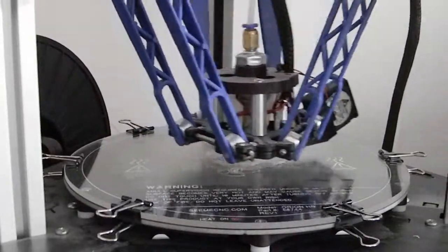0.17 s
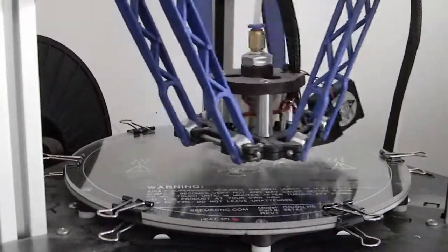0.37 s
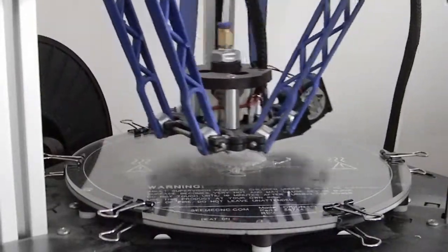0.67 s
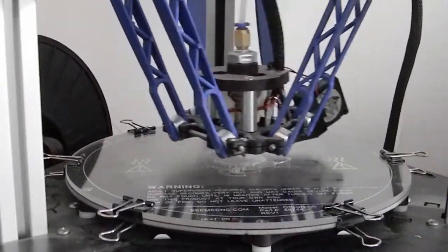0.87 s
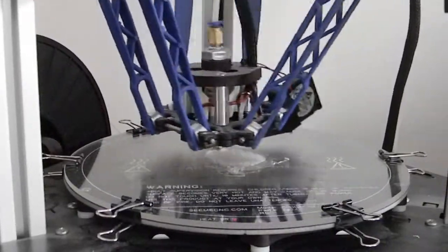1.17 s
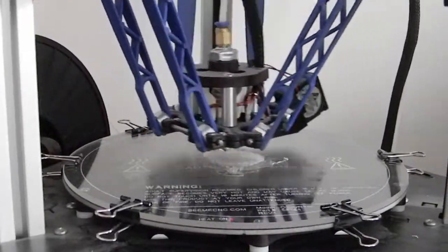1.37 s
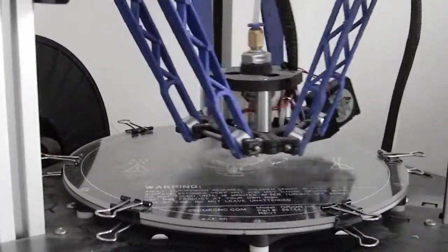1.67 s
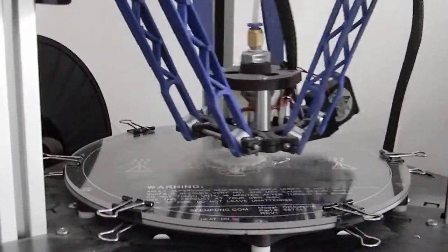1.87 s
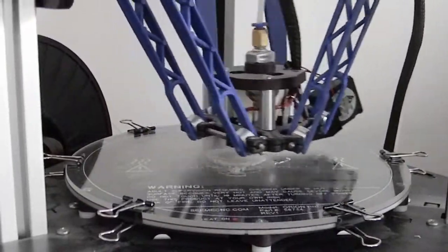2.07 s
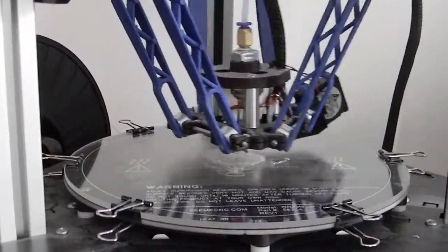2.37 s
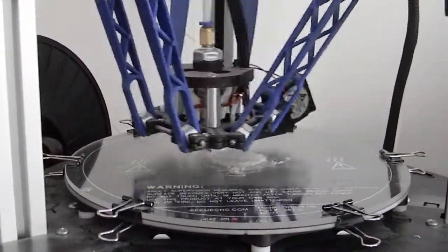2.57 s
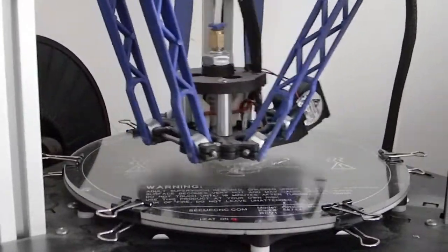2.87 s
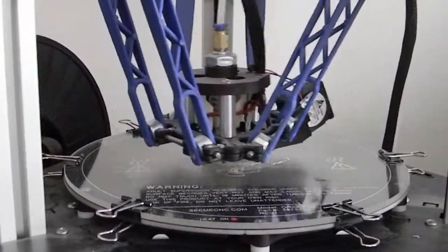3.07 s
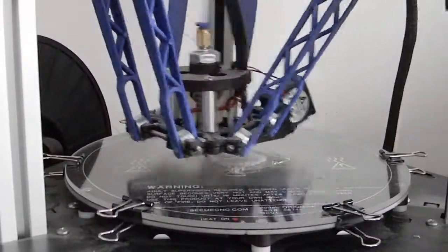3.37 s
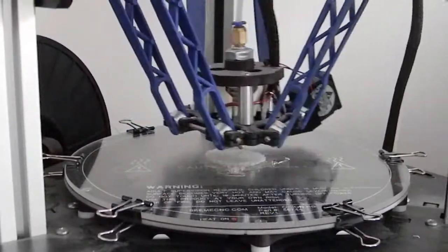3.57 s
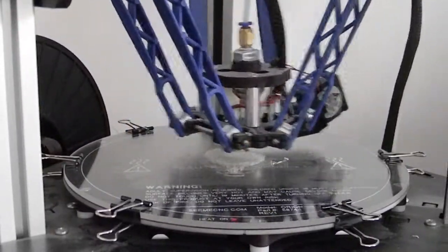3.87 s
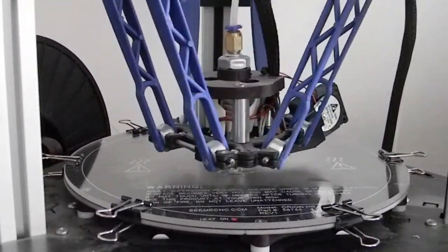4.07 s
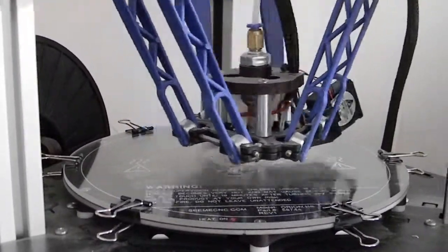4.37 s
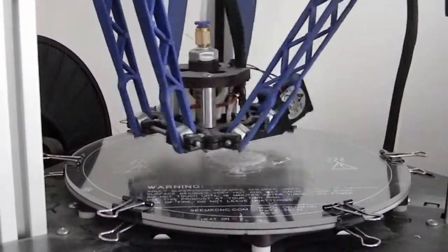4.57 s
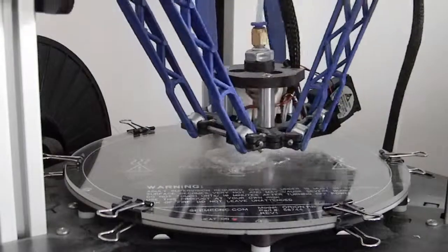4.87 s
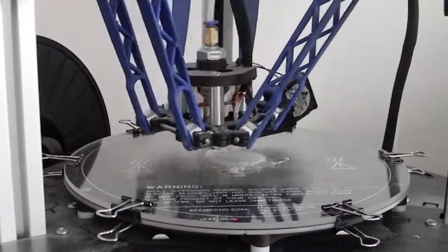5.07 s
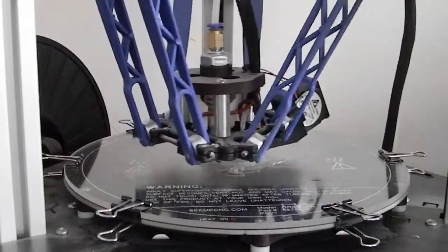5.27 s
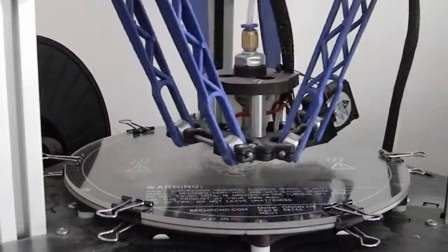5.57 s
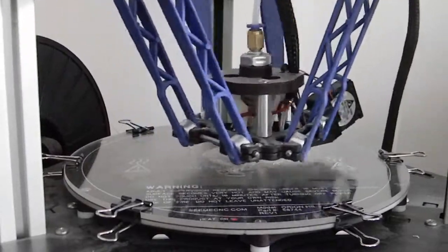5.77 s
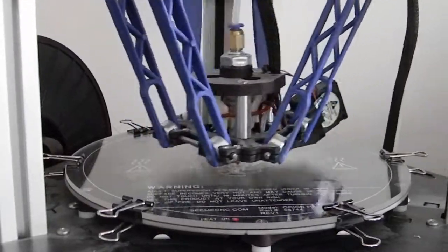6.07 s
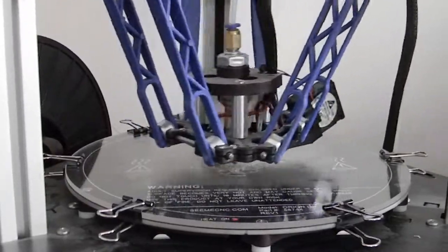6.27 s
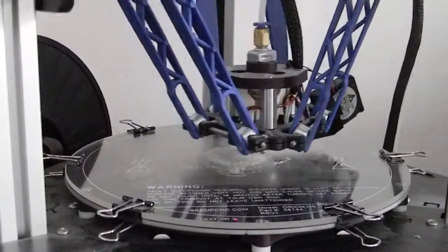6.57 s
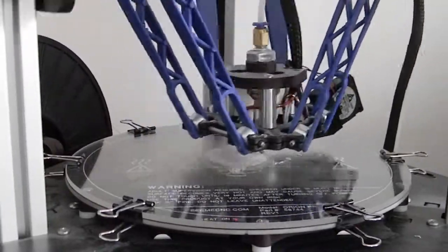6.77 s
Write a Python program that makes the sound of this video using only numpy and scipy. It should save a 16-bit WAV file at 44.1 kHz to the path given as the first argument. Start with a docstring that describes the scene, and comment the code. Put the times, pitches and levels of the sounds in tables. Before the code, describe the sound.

Close stereo sound of a 3D printer sped up. Stepper motors glide up and down in quick zigzag strokes, about ten per second, with a high buzzing extruder whine and a knock or shudder at each turn. Midway the strokes break into tiny jittery moves and chirps with dry hiss, then the regular zigzag returns. Fans hiss throughout in a small, fairly dry space.

```python
"""Beside a delta 3D printer laying infill, heard sped up several times by a close stereo pair.
On each stroke the tower steppers glide against each other while the extruder ticks at a steady high rate:
partials follow pitch curves. Turns and short moves shake the frame, made of motor tones and knocks
through resonances. Belts and joints sizzle as filtered noise; two fans hiss and whine throughout."""
import sys
import numpy as np
from scipy import signal
from scipy.fft import rfft, irfft, next_fast_len
from scipy.io import wavfile
from scipy.ndimage import uniform_filter1d

SR = 44100
rng = np.random.default_rng(int(sys.argv[2]) if len(sys.argv) > 2 else 0)


def to_wav(sig):
    """Store sig (one row per channel, or 1-D mono) as 16-bit WAV at the path in sys.argv[1].

    Samples outside -1..1 are clipped; the rate is SR.
    """
    pcm = np.clip(np.atleast_2d(sig), -1, 1) * 32767
    pcm = np.round(pcm).astype(np.int16)
    wavfile.write(sys.argv[1], SR, pcm.T)  # frames by channels


N = 304731
SIZE = next_fast_len(N, True)
TIME, FREQ = np.arange(N) / SR, np.fft.rfftfreq(SIZE, 1 / SR)

# partials of the steppers on short moves and hops: multiple, relative_db
MOTOR_PARTIALS = [(1, 3), (2, -1), (3, -8)]


def amp(db):
    """Decibels to gain."""
    return 10 ** (np.asarray(db) / 20)


def unit(x):
    """Scales to rms 1."""
    return x / np.sqrt(np.mean(x ** 2) + 1e-20)


def curve(rows, axis=1):
    """One column of a time table at every sample."""
    columns = np.transpose(rows)
    return np.interp(TIME, columns[0], columns[axis])


def spectrum(points):
    """Gain at every frequency from (Hz, dB) points."""
    hz, db = np.transpose(points)
    return amp(np.interp(np.log(FREQ + 1), np.log(hz), db))


def resonances(modes):
    """Gain of steep-sided resonances, each alone 12 dB down at its width from the peak."""
    power = sum(amp(db) ** 2 / (1 + ((FREQ - hz) / width) ** 2) ** 4 for hz, width, db in modes)
    return np.sqrt(power)


def colour(x, gain):
    """Filters by a gain at every frequency."""
    return irfft(rfft(x, SIZE) * gain, SIZE)[..., :N]


def drift(rate, order=N):
    """Slow chance of rms 1, changing about rate times a second, order samples long."""
    values = rng.standard_normal(order // 8)
    return unit(np.interp(2 * rate * TIME[:order], np.arange(len(values)), values))


def wide_noise(gain, side):
    """Coloured noise in two channels with an unrelated side part."""
    mid, other = unit(colour(rng.standard_normal((2, N)), gain))
    other = colour(other, side)
    return np.array([mid + other, mid - other])


def tone(hz, partials):
    """Sine partials at whole multiples of a pitch curve, each from a random phase."""
    turns = np.cumsum(hz) / SR
    waves = (amp(db) * np.sin(2 * np.pi * (round(k) * turns + rng.random())) for k, db in partials)
    return np.sqrt(2) * sum(waves)


def room(x, t60, wet_db):
    """Direct sound plus a short scatter of nearby reflections, different at each ear."""
    t = np.arange(SR // 8) / SR
    taps = rng.standard_normal((2, len(t))) * amp(-60 * t / t60)
    taps /= np.linalg.norm(taps, axis=1, keepdims=True)
    return x + amp(wet_db) * signal.fftconvolve(x[None], taps, axes=1)[:, :N]


def window(start, end, fade):
    """Sample numbers of a move and its soft-edged gate."""
    at = np.flatnonzero((TIME > start - fade) & (TIME < end + fade))
    edge = np.minimum(TIME[at] - start, end - TIME[at])
    return at, np.clip(.5 + .5 * edge / fade, 0, 1)


def bump(s, length):
    """A bell in time, half as high at half its length from the middle."""
    return 2 ** -np.minimum((2 * (TIME - s) / length) ** 2, 60)


def stepper(hz, partials, wobble=.004):
    """A motor's tone, with the grain of its own belt teeth; a large wobble of pitch makes it a buzz."""
    rough_db, rough_per_s = 1.6, 75
    grain = unit(amp(rough_db * drift(rough_per_s, order=len(hz))))
    return grain * tone(hz * (1 + wobble * drift(120, order=len(hz))), partials)


def extruder_dashes(count):
    """Gains that let each extruder partial come in quick dashes, all on one uneven beat."""
    dash_per_s, dash_db = 20, 5.5
    beats = np.cumsum(dash_per_s * (1 + .2 * drift(10))) / SR
    dashes = []
    for _ in range(count):
        swing = np.tanh(2 * np.sin(2 * np.pi * beats + drift(5)) + .5)
        dashes.append(unit(amp(dash_db * swing + 2 * np.tanh(drift(12)))))
    return dashes


def long_strokes(sum_hz, slope):
    """The lead motor glides, a second the other way, a third buzzes nearly level; the extruder steps."""
    # zigzag infill: start_s, end_s, lead_from_hz, lead_to_hz, extruder_step_hz,
    # whine_db (before the frame), whistle_hz, whistle_db
    strokes = [(0.0, 0.1, 550, 1160, 1234.0, -34.4, 4705, -50),
               (0.114, 0.215, 1160, 545, 1234.5, -36.6, 4700, -52),
               (0.233, 0.325, 505, 1160, 1254.0, -35.7, 4775, -55),
               (0.335, 0.432, 1135, 595, 1216.5, -36.1, 4620, -56),
               (0.447, 0.549, 535, 1185, 1206.5, -35.5, 4830, -58),
               (0.559, 0.654, 1150, 545, 1240.0, -35.6, 4725, -55),
               (0.67, 0.761, 480, 1150, 1229.0, -34.5, 4680, -55),
               (0.775, 0.87, 1135, 605, 1228.0, -38.8, 4680, -54),
               (0.9, 0.994, 480, 1150, 1238.0, -35.6, 4715, -53),
               (1.014, 1.121, 1160, 590, 1248.5, -37.5, 4755, -54),
               (1.131, 1.223, 520, 1150, 1200.5, -34.3, 4805, -55),
               (1.243, 1.343, 1160, 625, 1221.5, -38.3, 4630, -50),
               (1.365, 1.451, 620, 1125, 1250.5, -38.0, 4735, -52),
               (1.461, 1.546, 1090, 610, 1244.0, -38.1, 4715, -53),
               (1.56, 1.646, 490, 1100, 1246.0, -36.0, 4720, -52),
               (1.665, 1.751, 1090, 605, 1200.5, -37.3, 4800, -56),
               (1.771, 1.859, 540, 1100, 1256.0, -36.3, 4790, -53),
               (1.871, 1.955, 1090, 620, 1233.0, -38.3, 4700, -53),
               (1.974, 2.051, 585, 1110, 1209.5, -35.1, 4595, -54),
               (2.081, 2.147, 1040, 590, 1237.5, -37.7, 4720, -52),
               (2.175, 2.235, 695, 1015, 1218.0, -36.7, 4600, -53),
               (2.25, 2.308, 1030, 675, 1240.0, -39.9, 4715, -50),
               (2.322, 2.394, 650, 1050, 1254.5, -37.7, 4750, -54),
               (2.406, 2.483, 1015, 720, 1252.0, -41.5, 4765, -54),
               (2.525, 2.61, 595, 1110, 1227.0, -36.5, 4660, -52),
               (2.668, 2.737, 1090, 665, 1227.5, -39.3, 4665, -53),
               (2.769, 2.856, 570, 1125, 1211.0, -35.6, 4850, -52),
               (2.9, 2.966, 1015, 745, 1203.0, -36.0, 4805, -52),
               (2.982, 3.035, 715, 1065, 1213.0, -39.0, 4850, -54),
               (3.05, 3.1, 1050, 685, 1249.0, -39.4, 4570, -60),
               (3.21, 3.26, 750, 980, 1233.5, -38.9, 4675, -50),
               (3.274, 3.33, 1050, 750, 1212.0, -39.7, 4840, -54),
               (3.365, 3.435, 600, 1110, 1201.0, -33.9, 4800, -51),
               (3.565, 3.62, 680, 1030, 1223.0, -36.5, 4600, -55),
               (3.63, 3.68, 990, 810, 1200.0, -42.3, 4820, -57),
               (5.5, 5.56, 790, 1065, 1257.5, -36.2, 4670, -57),
               (5.592, 5.635, 1015, 775, 1243.5, -33.0, 4690, -52),
               (5.657, 5.72, 695, 1065, 1200.0, -32.1, 4800, -55),
               (5.746, 5.8, 1050, 710, 1259.0, -32.9, 4770, -50),
               (5.824, 5.86, 775, 1040, 1233.5, -33.1, 4810, -58),
               (5.875, 5.944, 1075, 705, 1236.0, -33.2, 4705, -50),
               (5.976, 6.04, 690, 1065, 1237.0, -32.8, 4675, -48),
               (6.062, 6.13, 1090, 655, 1256.5, -34.0, 4760, -51),
               (6.147, 6.215, 685, 1065, 1241.5, -32.8, 4705, -48),
               (6.229, 6.298, 1075, 605, 1199.0, -33.4, 4795, -51),
               (6.345, 6.42, 630, 1090, 1210.5, -32.3, 4840, -54),
               (6.442, 6.516, 1090, 655, 1214.0, -33.0, 4625, -54),
               (6.552, 6.634, 620, 1100, 1197.5, -32.8, 4785, -51),
               (6.65, 6.731, 1100, 625, 1232.5, -33.5, 4670, -52),
               (6.749, 6.84, 590, 1125, 1206.0, -32.6, 4825, -53),
               (6.856, 6.908, 1090, 785, 1245.0, -33.2, 4730, -54)]
    # lead motor: multiple, relative_db
    lead_partials = [(1, 0), (2, -6.5), (3, -14)]
    # second tower's motor: multiple, relative_db
    second_partials = [(1, 0), (2, -6)]
    # hum one octave below the lead motor: time_s, level_db (before the frame)
    undertone = [(0, -45), (2.8, -45), (3.7, -46), (5.5, -54), (6.91, -54)]
    # extruder steps: multiple, level_db (at the lead's usual pitch), gain_db_per_khz (of lead pitch)
    extruder_partials = [(2, -52.5, 0), (3, -57.5, 0), (4, -62, 0), (5, -53.5, 22), (6, -45, 0),
                         (7, -60, 0), (8, -49.5, -15), (9, -53, -5), (10, -49.5, 0), (11, -50.5, 0),
                         (12, -50.5, -10), (13, -55, 0)]
    mid_hz, arch_hz = 864, 34.1  # lead's usual mid-stroke pitch; bow from the arm geometry
    second_db, second_top_hz = -45, 830  # level at 600 Hz; highest pitch
    third_hz, third_scatter, third_db = 857, 0.0358, -42  # scatter is a share of pitch
    whistle_waver = .0015  # share of pitch
    follow_s = 0.057  # the frame follows the head's speed over this time

    whine, steps, moving, cruising, pace = np.zeros((5, N))
    dashes = extruder_dashes(len(extruder_partials))
    chances = rng.standard_normal((len(strokes), 2))
    for stroke, chance in zip(strokes, chances):
        start, end, from_hz, to_hz, step_hz, db, whistle_hz, whistle_db = stroke
        at, gate = window(start, end, fade=.006)
        part = np.clip((TIME[at] - start) / (end - start), 0, 1)
        middle = 4 * part * (1 - part)  # 1 in mid-stroke, 0 at the turns

        lead_hz = from_hz + (to_hz - from_hz) * part + arch_hz * middle
        second_hz = np.minimum(sum_hz - slope * lead_hz, second_top_hz)
        bend = chance[0] * part + chance[1] * (1 - part)
        buzz_hz = third_hz * (1 + third_scatter * bend)
        faster_khz = np.clip(lead_hz - mid_hz, -180, 170) / 1000

        sings = np.minimum(lead_hz / 760, 1) ** 5  # the lead motor fades when slow
        under_db = np.interp(start, *np.transpose(undertone))
        whine[at] += gate * sings * amp(db) * stepper(lead_hz, lead_partials)
        whine[at] += gate * sings * amp(under_db) * stepper(lead_hz / 2, [(1, 0)])
        second_level = amp(second_db) * (second_hz / 600) ** 2
        whine[at] += gate * second_level * stepper(second_hz, second_partials)
        buzz = stepper(buzz_hz, [(1, -6), (2, -2.5), (3, -9)], wobble=.016)
        whine[at] += gate * amp(third_db) * buzz

        flow = gate * middle ** .3  # the extruder runs hardest in mid-stroke
        for (k, level_db, db_per_khz), dash in zip(extruder_partials, dashes):
            level = flow * dash[at] * amp(db_per_khz * faster_khz)
            steps[at] += level * tone(np.full(len(at), step_hz), [(k, level_db)])
        waver = 1 + whistle_waver * drift(40, order=len(at))
        steps[at] += gate * tone(whistle_hz * waver, [(1, whistle_db)])

        moving[at] += gate
        cruising[at] += gate * middle
        pace[at] += gate * faster_khz
    return whine, steps, np.minimum(moving, 1), cruising, uniform_filter1d(pace, round(follow_s * SR))


def hops():
    """Each quick hop of the head, without extrusion, is one short chirp of a motor."""
    # start_s, end_s, from_hz, to_hz, whine_db (before the frame)
    hop_rows = [(2.96, 2.987, 755, 1030, -56), (3.135, 3.165, 720, 1000, -54),
                (3.17, 3.223, 1075, 767, -42), (3.328, 3.35, 747, 1110, -39), (3.445, 3.5, 1027, 664, -40),
                (3.5, 3.535, 1090, 910, -43), (3.548, 3.563, 700, 950, -30), (3.683, 3.699, 1052, 696, -32),
                (3.74, 3.77, 1030, 754, -49), (3.78, 3.794, 798, 1050, -32),
                (3.925, 3.959, 804, 1050, -35.5), (3.98, 4.01, 740, 932, -32.5),
                (4.06, 4.089, 1010, 750, -39.5), (4.34, 4.374, 1020, 760, -35),
                (4.415, 4.448, 770, 934, -39.5), (4.45, 4.473, 744, 1014, -37),
                (4.56, 4.588, 1006, 770, -42), (4.58, 4.613, 792, 1037, -39), (4.61, 4.666, 830, 770, -38),
                (4.745, 4.787, 735, 896, -42), (6.295, 6.336, 790, 1090, -37)]
    whine = np.zeros(N)
    for start, end, from_hz, to_hz, db in hop_rows:
        at, gate = window(start, end, fade=0.00507)
        glide_hz = np.interp(TIME[at], [start, end], [from_hz, to_hz])
        whine[at] += gate * amp(db) * stepper(glide_hz, MOTOR_PARTIALS)
    return whine


def short_moves(move_s, low_hz, high_hz, count=2):
    """Over many tiny segments the motors start together, glide each its own way, and fade at the corner."""
    edges = np.cumsum(move_s * (.4 + 1.2 * rng.random(2000))) - 2 * move_s
    move, part = np.divmod(np.interp(TIME, edges, np.arange(len(edges))), 1)
    out = np.zeros(N)
    for _ in range(count):
        first, last = rng.uniform(low_hz, high_hz, (len(edges), 2))[move.astype(int)].T
        out += tone(first + (last - first) * part, MOTOR_PARTIALS)
    return unit(out * np.sin(np.pi * part) ** .6)


def knocks(per_s):
    """Slack in the joints: small random knocks."""
    return unit(rng.standard_normal(N) * (rng.random(N) < per_s / SR))


def turn_levels(sizzle_db):
    """Strength of the frame shake and of the sizzle that the head's sharp turns cause."""
    # middle_s, length_s (before spreading), jolt_db (relative)
    turns = [(0.105, 0.024, -40), (0.226, 0.015, -37), (.329, 0.011, -44), (0.446, 0.026, -34.5),
             (0.554, 0.012, -34.5), (0.653, 0.018, -34.5), (0.777, 0.016, -49), (0.886, 0.041, -34.5),
             (1.009, 0.016, -32), (1.125, 0.017, -34), (1.237, 0.024, -34), (1.357, 0.029, -37),
             (1.444, 0.0088, -37), (1.553, 0.026, -32.5), (1.65, 0.025, -38), (1.761, 0.033, -32.5),
             (1.869, .012, -34.5), (1.958, 0.013, -33), (2.074, 0.039, -36.5), (2.164, 0.037, -34.5),
             (2.246, 0.021, -35), (2.319, 0.017, -34), (2.4, 0.019, -34.5), (2.504, 0.051, -31.5),
             (2.647, 0.065, -34.5), (2.763, 0.052, -32.5), (2.883, 0.054, -31), (2.977, 0.016, -33.5),
             (3.049, 0.026, -32.5), (3.096, 0.021, -34), (3.19, 0.045, -36), (3.268, 0.024, -39.5),
             (3.35, 0.037, -34.5), (3.5, 0.041, -35), (3.557, 0.028, -35), (3.633, 0.031, -35.5),
             (3.726, 0.022, -29.5), (3.802, 0.032, -34.5), (3.919, 0.013, -31), (3.995, 0.011, -32.5),
             (4.073, 0.018, -35), (4.14, 0.031, -42), (4.35, 0.018, -34), (4.398, 0.01, -34),
             (4.427, 0.0094, -35), (4.535, 0.0091, -37), (4.577, 0.02, -34.5), (4.756, 0.016, -34),
             (5.198, .012, -39), (5.5, 0.013, -33), (5.55, 0.072, -33), (5.647, 0.035, -35.5),
             (5.732, 0.028, -33.5), (5.822, 0.046, -33), (5.85, 0.036, -35), (5.963, 0.039, -33),
             (6.05, .025, -31.5), (6.127, 0.021, -36), (6.224, 0.014, -34.5), (6.317, 0.038, -31),
             (6.434, 0.023, -31), (6.535, 0.037, -31.5), (6.648, 0.015, -39), (6.742, 0.019, -31),
             (6.848, 0.015, -52)]
    ring_s, sizzle_spread_s = 0.012, 0.0061  # added to each turn's length
    shake, sizzle = np.zeros((2, N))
    for s, length, db in turns:
        shake += amp(db) ** 2 * bump(s, length + ring_s) ** 2
        sizzle += amp(db + sizzle_db) ** 2 * bump(s, length + sizzle_spread_s)
    return np.sqrt(shake), np.sqrt(sizzle)


def frame(whine, moving, pace, turn_shake):
    """Motor whine, darting moves and knocks all ring through the frame and thud into the stand."""
    # shaking by small moves: time_s, lower_modes_db, upper_modes_db (both relative)
    shake = [(0, -28, -36), (2.4, -34.5, -37.5), (3.5, -36.5, -36.5), (4.0, -37.5, -38), (4.06, -34, -38),
             (4.4, -33.5, -37), (4.77, -33, -39.5), (4.79, -38.5, -39), (5.45, -37.5, -38),
             (5.48, -30.5, -37.5), (6.91, -31.5, -36.5)]
    # drive of the deep modes and stand by the head's position: time_s, drive_db (relative)
    deep_curve = [(0, 6.5), (1, 3.5), (1.8, 7), (2.8, 5), (3.7, 7), (4.4, -2.5), (5.1, 1.5), (5.6, -3.5),
                  (6.3, 1), (6.91, -2)]
    # frame resonances, deep, low and high, then the stand's heavy parts: centre_hz, width_hz, relative_db
    deep_modes = [(502.5, 41, -5.5), (573, 58, -6)]
    low_modes = [(668, 86, -8), (751.4, 34, -0.6), (821, 69, -3), (934, 110, -2), (1050, 114, -2.5),
                 (1140, 65, -3.5)]
    high_modes = [(1347, 99, -7), (1427, 43, -7), (1530, 53, -2), (1709, 150, 0), (1839, 59, -0.5),
                  (1920, 114, -6), (2045, 110, -9.5), (2250, 71, -6.5), (2530, 64, -13), (2476, 160, -4.5),
                  (2740, 130, -5), (3180, 120, -14.5)]
    stand_modes = [(89.5, 64, 0.5), (256, 98, 3), (361, 68, 5)]
    # how strongly the frame sings with a motor at each pitch: pitch_hz, gain_db
    whine_response = [(440, -30), (500, -6), (545, -.5), (600, -5), (680, -13), (760, -5.5), (845, -10),
                      (900, -5), (950, -2), (1040, -.5), (1150, -5), (1240, -20), (1540, -4), (1930, -1),
                      (2050, -16), (3400, -16)]
    calm_db, upper_calm_db = -11.5, -5  # a long stroke calms the frame
    shake_db_per_khz, deep_db_per_khz = 6, 26  # more shaking while the lead motor is fast

    deep, low, high = resonances(deep_modes), resonances(low_modes), resonances(high_modes)
    deep_drive = amp(curve(deep_curve))
    darting = short_moves(move_s=.016, low_hz=560, high_hz=1180, count=3)
    rattle = knocks(per_s=3500)
    push = darting + amp(7) * rattle
    jolt = short_moves(move_s=.006, low_hz=480, high_hz=1180, count=3) + amp(12) * rattle

    deep_share = deep_drive * amp(deep_db_per_khz * pace - 5.0)
    lower = unit(colour(push, low) + amp(8.5) * deep_share * colour(push, deep))
    jolted = unit(colour(jolt, low) + deep_share * colour(jolt, deep))
    upper = unit(unit(colour(darting, high)) + amp(-0.5) * unit(colour(rattle, high)))

    calm = amp(calm_db * moving + shake_db_per_khz * pace)
    shake_level, jolt_level = amp(curve(shake) - 3.0) * calm, amp(-2.0) * turn_shake
    upper_steady = amp(curve(shake, axis=2) + 0.13) * amp(upper_calm_db * moving)
    upper_level = np.hypot(upper_steady, amp(-8.0) * turn_shake)
    sung = colour(whine, spectrum(whine_response))
    ringing = lower * shake_level + jolted * jolt_level + upper * upper_level + sung
    radiated = spectrum([(300, -31), (455, -20), (505, -0.5)])  # light struts give off little bass
    body = room(colour(ringing, radiated), t60=0.036, wet_db=-30)

    thud_level = unit((np.hypot(shake_level, jolt_level) * deep_drive) ** 0.54)
    thud = wide_noise(resonances(stand_modes), side=amp(-7.5)) * thud_level * amp(-67.0)
    # the frame's ringing reaches the left side one sample first
    return np.array([body[0], np.roll(body[1], 1)]) + thud


def belts(cruising, pace, turn_sizzle):
    """Belts rasp and joints sizzle, each with its own grit, with a thin creeping hiss and a top hiss."""
    # belts and joints: time_s, level_db (relative)
    sizzle_curve = [(0, -38), (2.4, -39.5), (3.7, -38), (4.15, -39), (4.75, -39.5), (4.79, -43),
                    (5.45, -41.5), (5.48, -38), (6.91, -39.5)]
    # thin hiss of the belts during slow moves: time_s, level_db (before flutter)
    creep_curve = [(0, -93.5), (3.8, -62), (4.3, -46.5), (4.74, -47), (4.85, -40), (4.95, -40.5),
                   (5.1, -46), (5.19, -40), (5.3, -42.5), (5.44, -45), (5.52, -85), (6.91, -79)]
    # fine hiss at the very top: time_s, level_db (before the band limit)
    top_curve = [(0, -47), (2, -45), (3.7, -45), (4.6, -40), (4.85, -48), (5.4, -46), (5.55, -38),
                 (6.2, -43), (6.91, -35.5)]
    # resonances of belts, joints and creeping belts: centre_hz, width_hz, relative_db
    belt_modes = [(2570, 1570, 2), (3630, 210, -2.5), (4570, 350, -3.5), (5180, 290, 2.5), (5620, 110, 4),
                  (6055, 195, 4), (6820, 350, 1), (7550, 370, 0)]
    joint_modes = [(8300, 1500, -1.2), (9740, 1080, 1), (11030, 1300, 1.5), (12240, 610, 0.5),
                   (13200, 1800, 0.5), (14400, 850, 0.5), (14840, 640, 4.5)]
    creep_modes = [(5240, 150, 7), (5730, 280, -14), (5930, 400, 7.5), (6600, 250, 2), (7360, 1000, 2),
                   (13900, 750, 0)]
    smooth_db, sizzle_db_per_khz = -3.5, -11  # joints run smoothest in mid-stroke; fast ones sizzle less
    flutter_db, flutter_per_s = 2, 30

    steady, smooth = amp(curve(sizzle_curve) - 2.0), amp(smooth_db * cruising)
    level = np.hypot(steady * smooth, amp(-3) * turn_sizzle) * amp(sizzle_db_per_khz * pace)
    rasp_shape = np.hypot(steady * np.sqrt(smooth), amp(-3.5) * turn_sizzle) ** 2.15
    rasp_level = amp(-42.0) * unit(rasp_shape)
    rasp_grit = unit(amp(4.1 * np.tanh(drift(229))))
    rasp = wide_noise(resonances(belt_modes), side=amp(-25)) * rasp_level * rasp_grit

    sizzle = np.zeros((2, N))
    for hz, width, db in joint_modes:
        grit = unit(amp(2.84 * drift(40)))
        noise = wide_noise(resonances([(hz, width, 0)]), side=amp(-7.0))
        sizzle += amp(db) * np.sqrt(width) * grit * noise
    sizzle = unit(sizzle) * level * amp(2.5) * unit(amp(1.05 * drift(450)))

    creep_level = amp(curve(creep_curve) + flutter_db * drift(flutter_per_s))
    creep = wide_noise(resonances(creep_modes), side=amp(-13)) * creep_level
    top = wide_noise(resonances([(15860, 380, 0)]), side=amp(-3)) * amp(curve(top_curve))
    return rasp + sizzle + creep + top


def fans():
    """Rushing air and the slightly wavering blade tones of two fans."""
    # air through the fans: frequency_hz, relative_db (per Hz)
    air_points = [(25, -42), (100, -21), (190, -20), (440, -7), (600, 4), (950, -1.5), (1600, -35),
                  (2200, -15), (2650, 2.5), (3400, 4.5), (3900, -0.5), (5400, 2), (8500, -9.5),
                  (15700, -13.5)]
    # width of the air sound: frequency_hz, side_over_mid_db
    air_side = [(60, -35), (200, 0.5), (800, -9), (1600, 12), (2700, 0.5), (4200, -1), (5500, -3),
                (10000, 5.5), (15000, -5)]
    # fan tones: multiple (of the blade rate), level_db
    big_partials = [(1, -68), (2, -51), (3, -61.5), (4, -51), (5, -58.5), (6, -65), (7, -54), (8, -63)]
    small_partials = [(1, -56), (3, -56.5), (4, -49.5)]
    air_db, big_hz, small_hz = -40.5, 420, 819.2  # mean air level; blade rates
    air_level = amp(air_db + 0.86 * drift(9.1))
    air = air_level * wide_noise(spectrum(air_points), side=spectrum(air_side))
    big = tone(big_hz * (1 + 0.00054 * drift(11.4)), big_partials)
    small = tone(small_hz * (1 + 0.0017 * drift(15.35)), small_partials)
    return air + room(big + small, t60=.06, wet_db=-46)


def scene():
    """Moving parts, their level dipping at each brief stop, over the steady fans."""
    # brief stops of the motors: middle_s, length_s, depth_db
    stops = [(3.97, 0.0069, -23), (4.049, 0.019, -8), (4.164, 0.0082, -15), (4.194, 0.0083, -13),
             (4.217, 0.0055, -3), (4.38, 0.013, -12), (4.404, 0.0083, -10), (5.342, .012, -3)]
    whine, steps, moving, cruising, pace = long_strokes(sum_hz=1470, slope=.95)
    turn_shake, turn_sizzle = turn_levels(sizzle_db=-6)
    running = amp(sum(db * bump(s, length) for s, length, db in stops))
    extruder = room(steps, t60=.012, wet_db=-6)
    body = frame(whine + hops(), moving, pace, turn_shake)
    hiss = belts(cruising, pace, turn_sizzle)
    # left and right trims in dB
    motion = body * amp([[-.1], [.1]]) + (hiss + extruder) * amp([[-.5], [.5]])
    return running * motion + fans() * amp([[-.3], [.3]])


def record(dry):
    """The stereo pair leans slightly to the right and hears nothing above its band limit."""
    edge_hz = 15790
    band = np.clip((edge_hz - FREQ) / 60 + .5, 0, 1)
    return colour(dry * amp([[-.22], [.22]]), band)


dry = scene()
out = record(dry)
to_wav(out)
```